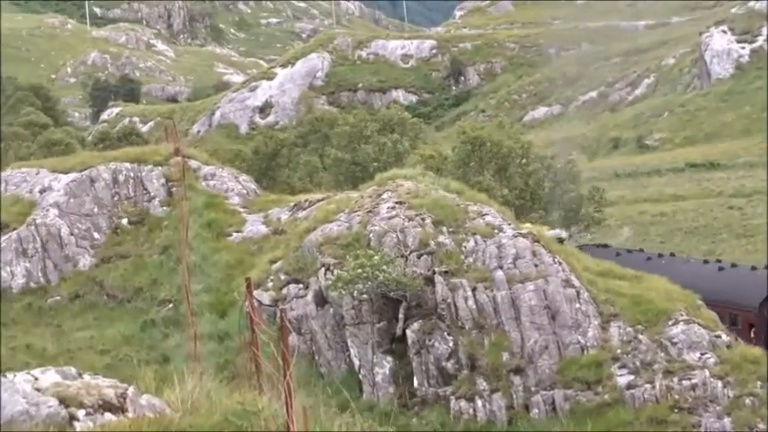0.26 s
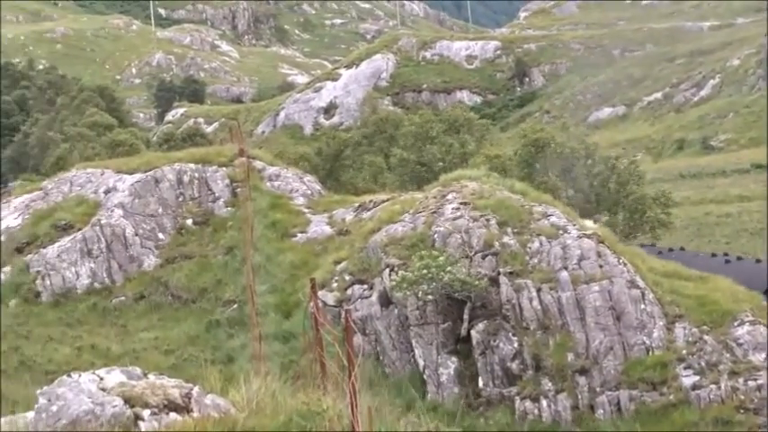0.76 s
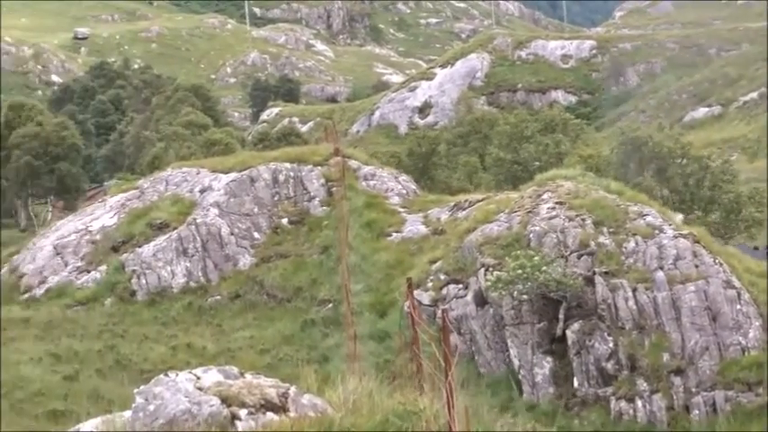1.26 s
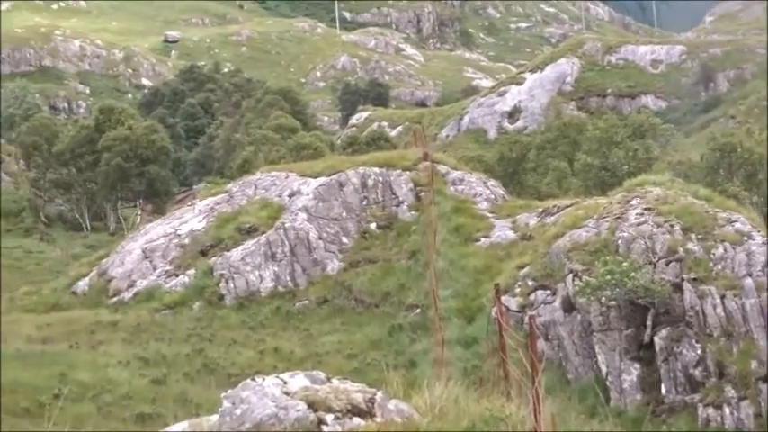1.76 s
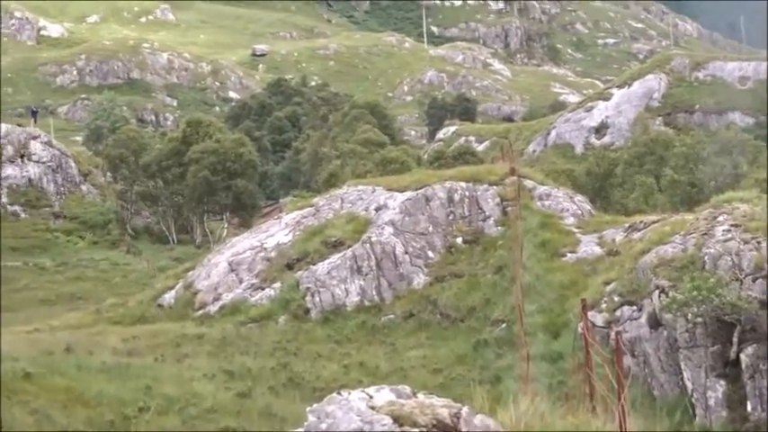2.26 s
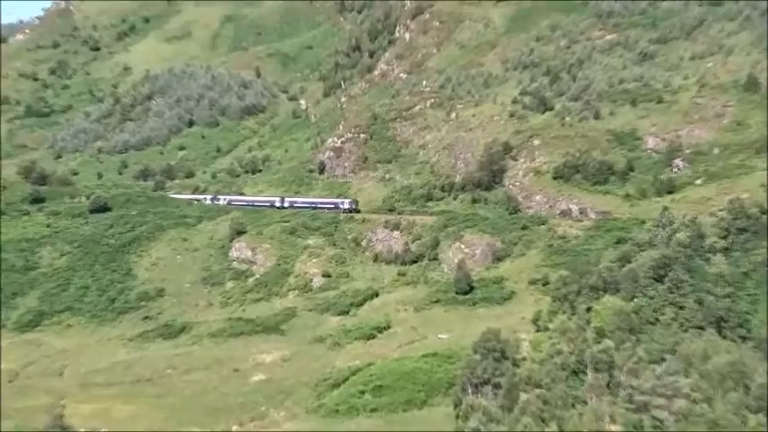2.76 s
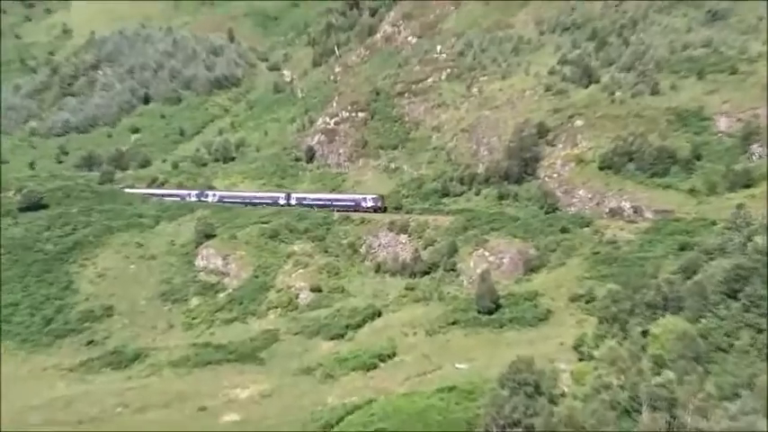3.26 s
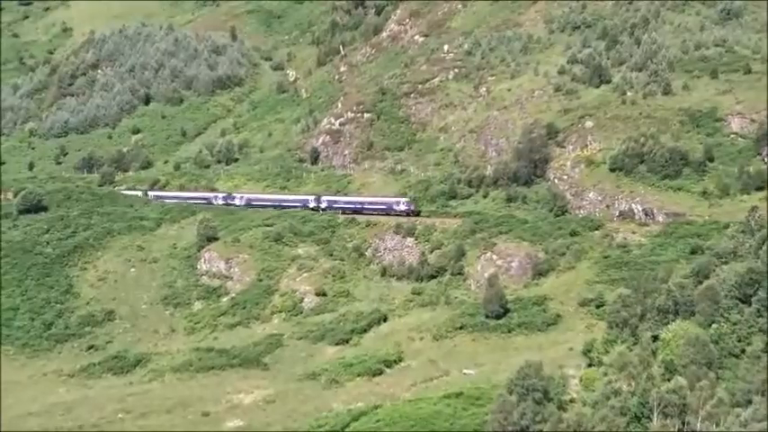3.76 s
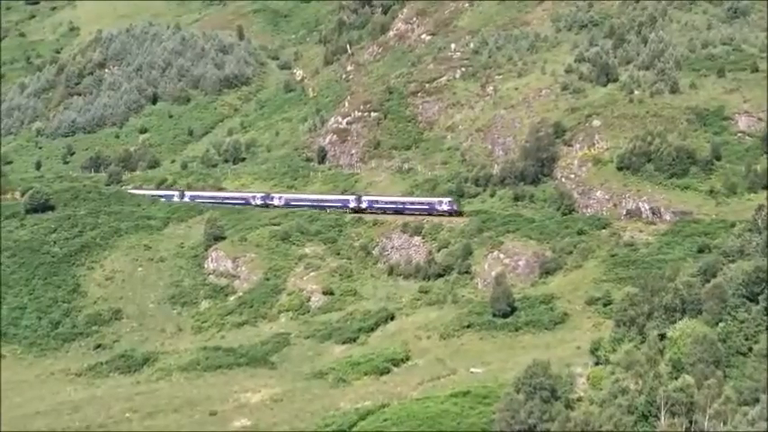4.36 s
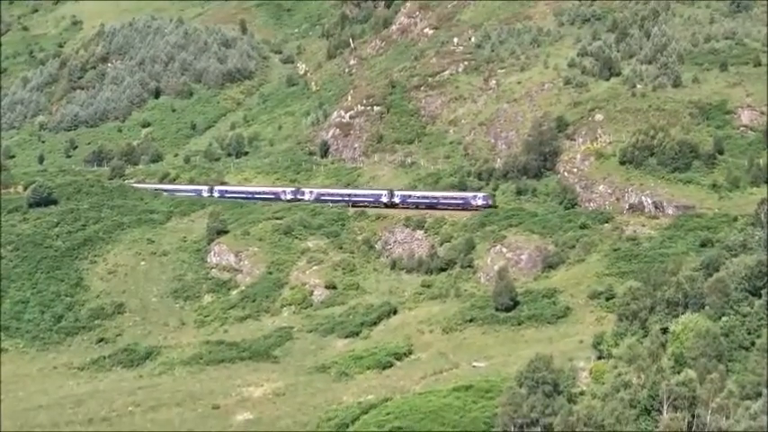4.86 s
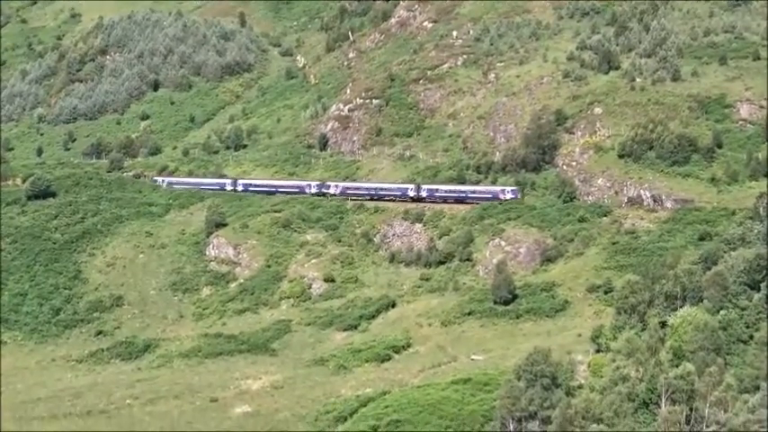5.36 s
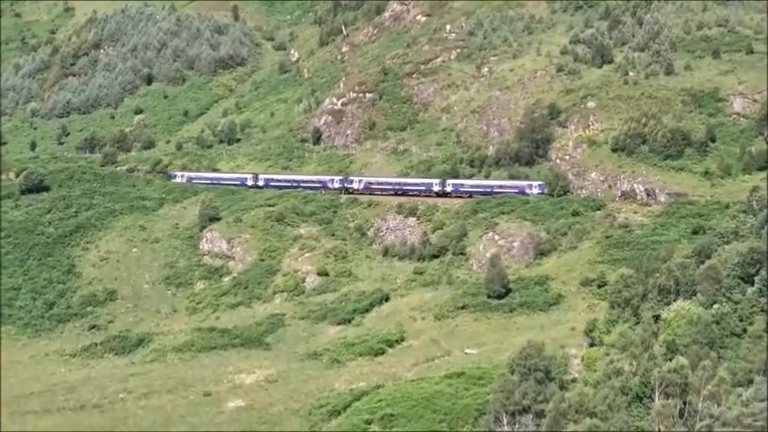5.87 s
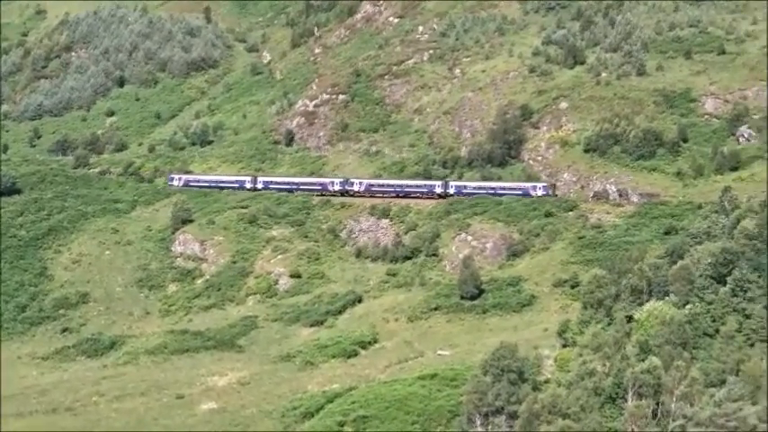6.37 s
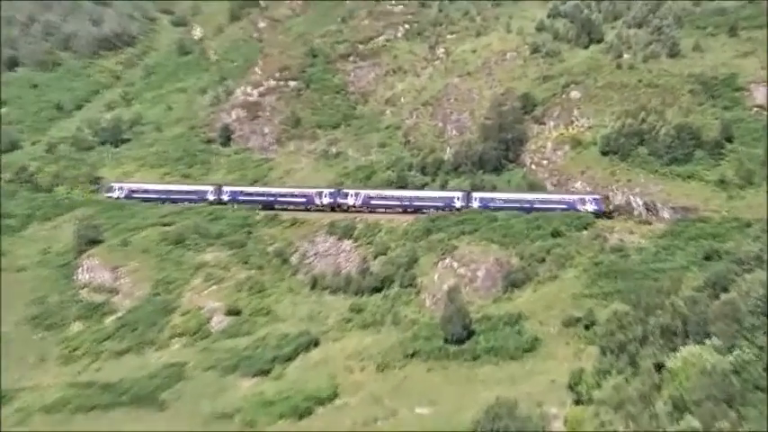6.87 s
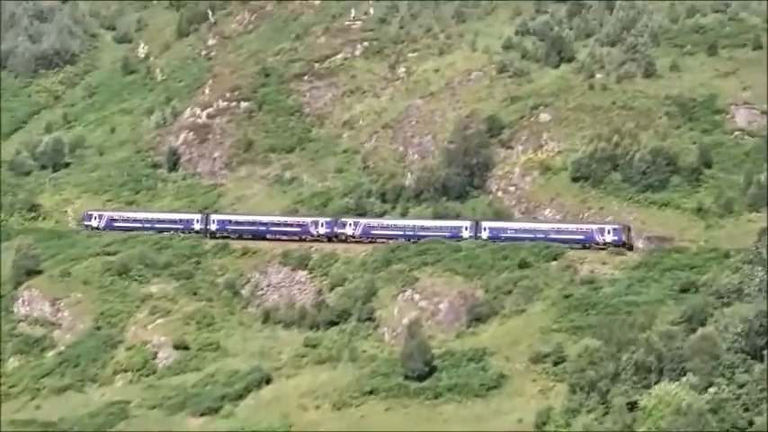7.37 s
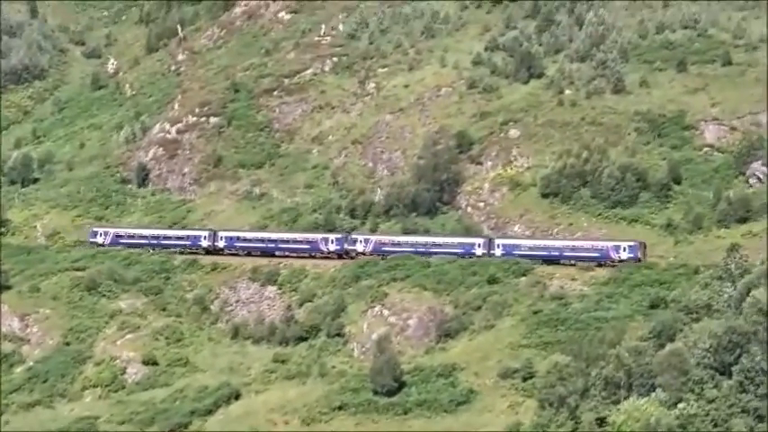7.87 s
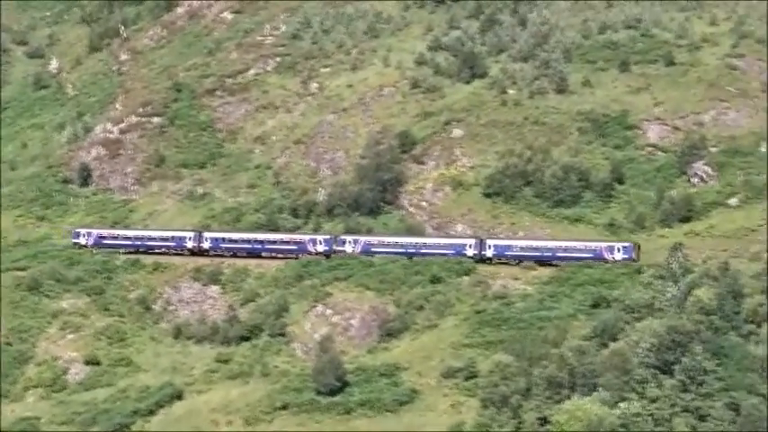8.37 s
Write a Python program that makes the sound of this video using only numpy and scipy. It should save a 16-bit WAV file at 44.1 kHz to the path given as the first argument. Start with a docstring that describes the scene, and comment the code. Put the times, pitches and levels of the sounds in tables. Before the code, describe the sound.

Loud rapid steam exhaust beats over rolling coaches stop dead; a faraway railcar then rumbles and knocks across a valley, with early gusts on the microphone.

```python
"""Hillside above a railway

Heard from a hillside through a camcorder's two microphone ports. Close below, a steam engine works hard:
band-split noise makes the exhaust beats, coaches and steam spurts, and wavering sines the flange squeals.
After an abrupt cut and a moment of silence, a railcar train rolls far across the valley, its bogies knocking
in pairs in ringing noise over a flickering roar. Low noise gusts buffet the microphone. At the camcorder
itself, resonant noise whirs as the zoom motor, short bursts tick on the body, and the preamplifier hisses."""
import sys
import numpy as np
from scipy import signal
from scipy.fft import rfft, irfft
from scipy.io import wavfile
from scipy.ndimage import uniform_filter1d

SR = 44100
rng = np.random.default_rng(int(sys.argv[2]) if len(sys.argv) > 2 else 0)


def int16_out(signal):
    """Quantize to a 16-bit WAV file."""
    q = np.round(np.clip(np.atleast_2d(signal).T, -1, 1) * 32767)
    wavfile.write(sys.argv[1], SR, q.astype(np.int16))


N = 379701
T = np.arange(N) / SR
FREQS = np.fft.rfftfreq(N, 1 / SR) + 1e-3  # Hz, kept off zero for the logarithms

# The near view ends and the far view starts [s]; upper limit of the sound [Hz]
CUT_S, RESUME_S = 2.582, 2.619
TOP_HZ = 15750

# Event levels are nominal: trims and random flutter in the functions, then the gain control, act on them.

# Close below: the four strokes of one turn of the driving wheels, late or early from uneven valve timing:
# (lateness [s], level [dB], blast length [s])
WHEEL_STROKES = [(-0.0032, -13.0, 0.053), (0.00086, -13.5, .057), (0.0054, -13, .054), (0, -12, 0.058)]
# Treble of the exhaust beats: (time [s], level [dB])
BEAT_TREBLE = [(0.05, 1), (.7, -2), (1.4, -2), (1.95, 1.5)]
# First beat, nominal spacing, and how much each spacing shortens as the engine gathers speed
FIRST_BEAT_S, BEAT_S, QUICKEN_S = .038, .146, .00031
# Rolling coaches: (time [s], level [dB])
COACH_LEVEL = [(0, -21), (0.7, -19), (1.2, -18), (1.85, -16.6), (2.55, -17)]
# Spurts of steam: (time [s], level [dB], length [s], brightness [dB])
STEAM_SPURTS = [(.59, -24.5, 0.028, -1), (.845, -23, 0.015, -2), (1.182, -18, 0.0083, -1),
                (1.428, -19.5, 0.03, -3.5), (2.546, -15.5, 0.018, -1)]
# Wheel flange squeals: (time [s], length [s], pitch [Hz], level [dB])
FLANGE_SQUEALS = [(0.85, 0.096, 5590, -35), (.84, 0.12, 8160, -33.5), (0.85, 0.11, 8500, -32),
                  (1.145, .04, 9800, -36.5), (1.38, 0.14, 8130, -43), (1.42, 0.15, 7010, -40),
                  (1.48, 0.035, 8480, -27.5), (2.04, .06, 8250, -47), (2.461, .08, 8480, -31.5)]

# Across the valley: bogies crossing rail joints:
# (time [s], leading axle level [dB], trailing axle level [dB], brightness [dB])
BOGIE_CROSSINGS = [(2.841, -25.5, -25, 4.5), (2.981, -31, -33, 3), (3.369, -22, -20.5, 4.5),
                   (4.168, -29, -28.5, -0.5), (4.556, -28, -29, -1.5), (4.687, -27, -31, -4),
                   (5.068, -27, -31.5, -4), (5.482, -29, -29.5, -3), (5.986, -30.5, -29, -2),
                   (6.222, -29.5, -32.5, -2.5), (6.718, -34.5, -30.5, -1.5), (7.129, -27.5, -28, -1.5),
                   (7.262, -30.5, -32.5, -2), (7.629, -33, -30, -0.5), (7.985, -35, -31, -0.5),
                   (8.385, -25, -29, -3)]
# Distance between the axles of a bogie; speed of the train at the start of the far view, and its gain
AXLE_GAP_M, SPEED_M_S, GAIN_M_S2 = 2.6, 13.25, .19
# How long a knock holds; the fainter joints: knocks a second, level, brightness
KNOCK_S, CLATTER_PER_S, CLATTER_DB, CLATTER_BRIGHT_DB = .02, 5, -38.5, -1.5
# Roar of the distant wheels: (time [s], middle level [dB], treble level [dB])
ROAR_LEVELS = [(2.65, -41.5, -46), (3.81, -32.5, -39), (4.72, -35, -48), (5.17, -37.5, -47),
               (5.62, -37, -48.5), (6.74, -44, -49), (7.32, -39, -46.5), (8.6, -33.5, -44.5)]
# Its bass at the start of the far view, and its steady growth as the train comes nearer
RUMBLE_DB, RUMBLE_DB_PER_S = -40.5, 0.65

# Gusts on the microphone: (time [s], level [dB], time from onset to the start of the fall [s])
WIND_GUSTS = [(2.638, -38, 0.19), (2.99, -37.5, 0.56), (4.1, -57, .45), (6.65, -65, .8)]
BREEZE_DB, GUST_RISE_S, GUST_FALL_S = -61, 0.1, 0.14

# At the camcorder: zoom motor runs: (start [s], stop [s], level [dB])
ZOOM_RUNS = [(2.61, 3.45, -51), (6.556, 7.126, -53)]
# Ticks of its body: (time [s], level [dB], resonance [Hz])
BODY_TICKS = [(3.003, -33, 2390), (3.321, -32, 1800), (3.334, -31.5, 1900), (6.335, -44, 3000),
              (7.042, -29, 1900), (7.596, -32.5, 2970)]

# Spectrum of the exhaust blast: (frequency [Hz], relative density [dB per Hz])
BLAST_SPECTRUM = [(60, -25), (130, -11), (240, -2.5), (370, -5.5), (520, 0), (700, -1.5), (780, -10.5),
                  (1000, -4), (1220, -15), (1450, -11), (2200, -15), (5500, -31), (8300, -29), (14500, -55)]
# Spectrum of the coaches: (frequency [Hz], relative density [dB per Hz])
COACH_SPECTRUM = [(25, -18), (50, -8.5), (95, -11), (170, -1), (290, 2), (430, -6), (720, -6.5),
                  (1200, -15), (2300, -16.5), (6200, -33.5), (8300, -31.5), (14500, -56)]
# Spectrum of the steam spurts: (frequency [Hz], relative density [dB per Hz])
STEAM_SPECTRUM = [(500, 1.5), (1500, 1), (3300, 0), (5500, -9.5), (8500, -9), (15000, -37)]
# Spectrum of the distant train: (frequency [Hz], relative density [dB per Hz])
VALLEY_SPECTRUM = [(100, -28.5), (200, -12.5), (320, 1.5), (420, 0.5), (530, -5), (780, -1), (1020, -7),
                   (1170, -17.5), (1500, -17), (1850, -20.5), (2400, -22.5), (3900, -33), (6000, -51)]
# Spectrum of wind on the microphone: (frequency [Hz], relative density [dB per Hz])
WIND_SPECTRUM = [(20, -6), (50, 1), (140, 0), (230, -5.5), (500, -46)]
# Spectrum of the preamplifier hiss: (frequency [Hz], relative density [dB per Hz])
HISS_SPECTRUM = [(4000, 2.5), (6300, -5), (8300, 2.5), (15500, -1.5)]
# Metallic ring of the distant train: (frequency [Hz], width [Hz], level relative to its spectrum [dB])
TRAIN_RINGS = [(1475, 250, -8), (2330, 123, 8), (3010, 79, 0), (3810, 140, -1)]
# Modes of the camcorder housing: (frequency [Hz], width [Hz], relative level [dB])
HOUSING_MODES = [(7500, 1800, -0.5), (10100, 770, 0), (11600, 820, -1), (13600, 1200, 5)]

# Between the ports, for sound from one side: (frequency [Hz], phase by which left leads [rad])
LEFT_LEAD = [(60, 0.08), (350, .36), (750, .53), (1500, .56), (3000, 0.38), (7000, 0.04)]
# Between the ports, for the near view: (frequency [Hz], left minus right [dB])
NEAR_BALANCE = [(60, -0.5), (700, -0.5), (1290, -3), (4400, -1.5), (8000, -0.8)]
# Difference noise against shared noise at the ports: (frequency [Hz], level [dB])
PORT_DIFFERENCE = [(50, -17), (200, -21), (600, -19), (1200, -15), (3000, -12.5), (7000, -12), (13000, -16)]


def exhaust(bark_db=2.5, hiss_db=2.0, bark_rasp_db=1.1, hiss_rasp_db=2.0, patchy_db=2.5, split_hz=1300):
    """Each cylinder stroke barks in the chimney at once; the ragged hiss of the jet swells after it."""
    body, hiss = split(scatter(noise(BLAST_SPECTRUM), patchy_db), split_hz)
    strokes = beats()
    bark, _ = puffs(strokes, rise=.013, fall=.024, sag_db=2.1)
    _, jet = puffs(strokes, rise=0.019, fall=0.025, sag_db=1.9)
    eddies = walk(200)
    barking = body * bark * undb(bark_db + bark_rasp_db * eddies)
    hissing = hiss * jet * undb(hiss_db + hiss_rasp_db * eddies)
    return barking + hissing


def beats(count=18, uneven_db=0.9):
    """Four beats a wheel turn, slowly quickening: rows of (time [s], level [dB], length [s], brightness [dB])."""
    k = np.arange(count)
    late, db, length = np.array(WHEEL_STROKES)[k % len(WHEEL_STROKES)].T
    s = FIRST_BEAT_S + BEAT_S * k - QUICKEN_S * k ** 2 / 2 + late
    level_db = db + uneven_db * rng.standard_normal(count)
    bright_db = np.interp(s, *np.transpose(BEAT_TREBLE))
    return np.column_stack([s, level_db, length, bright_db])


def coaches(roll_db=-0.04, rattle_db=1.0, patchy_db=2.5):
    """Wheels rumble and rattle on the rails under the beats."""
    level_db, = curves(COACH_LEVEL)
    rolling = scatter(noise(COACH_SPECTRUM), patchy_db)
    return rolling * undb(level_db + roll_db + rattle_db * walk(45))


def spurts(split_hz=5000):
    """Short, sharp escapes of steam."""
    body, hiss = split(noise(STEAM_SPECTRUM), split_hz)
    low, high = puffs(STEAM_SPURTS, rise=0.0017, fall=0.0083)
    return body * low + hiss * high


def flanges(waver=.004, flutter_db=2.8):
    """Flanges rub the curved rail and briefly set a high wheel mode singing."""
    out = np.zeros(N)
    warped_time = np.cumsum(1 + waver * walk(170)) / SR  # makes the pitches waver together
    for s, length, hz, db in FLANGE_SQUEALS:
        on = (T > s) & (T < s + length)
        swell = np.sin(np.pi * (T[on] - s) / length)
        out[on] += undb(db) * np.sqrt(2) * swell * np.sin(2 * np.pi * hz * warped_time[on])
    return out * undb(flutter_db * walk(50))


def rail_joints(knock_db=0.3, treble_db=1.2, rasp_db=1.7, split_hz=900):
    """Wheels of the distant train knock on the rail joints; the ground on the way roughens each knock."""
    rough = unit(far_noise(patchy_db=1.5) * undb(rasp_db * walk(200)))
    body, hiss = split(rough, split_hz)
    low, high = puffs(knocks(), rise=0.0078, fall=0.02, sag_db=1.2)
    return undb(knock_db) * (body * low + undb(treble_db) * hiss * high)


def knocks(spread_db=0.5):
    """Axle pairs and random clatter as rows of (time [s], level [dB], length [s], brightness [dB])."""
    rows = []
    for s, leading_db, trailing_db, bright_db in BOGIE_CROSSINGS:
        speed = SPEED_M_S + GAIN_M_S2 * (s - RESUME_S)
        rows.append((s, leading_db, KNOCK_S, bright_db))
        rows.append((s + AXLE_GAP_M / speed, trailing_db, KNOCK_S, bright_db))
    # fainter joints, at scattered times and strengths
    for k, (when, strength) in enumerate(rng.uniform(-1.006, 1, size=(60, 2))):
        s = RESUME_S + (k + 1 + when) / CLATTER_PER_S
        rows.append((s, CLATTER_DB + spread_db * strength, KNOCK_S, CLATTER_BRIGHT_DB))
    return rows


def valley(middle_db=0.0, treble_db=-0.3, flicker_db=1.15, sway_db=0.74, low_hz=550, high_hz=1150):
    """The slopes smear the rolling wheels into a flickering roar whose bass, middle and treble sway apart."""
    body, hiss = split(far_noise(patchy_db=2), high_hz)
    bass, mid = split(body, low_hz)
    middle, treble = curves(ROAR_LEVELS)
    rumble = RUMBLE_DB + RUMBLE_DB_PER_S * (T - RESUME_S)
    bands = [(bass, rumble), (mid, middle + middle_db), (hiss, treble + treble_db)]
    roar = sum(unit(x) * undb(db + sway_db * walk(17.1)) for x, db in bands)
    return roar * undb(flicker_db * walk(28.3))


def far_noise(patchy_db):
    """Noise of the distant train: dulled by the air, with a metallic ring."""
    x = noise(VALLEY_SPECTRUM)
    return scatter(x + resonances(x, TRAIN_RINGS), patchy_db)


def wind(buffet_db=3.0):
    """Gusts swell, hold and die away over a light breeze; their eddies buffet the microphone."""
    force = undb(BREEZE_DB)
    for s, db, length in WIND_GUSTS:
        rise = np.clip((T - s) / GUST_RISE_S, 0, 1)
        fall = np.exp(-np.maximum(T - s - length, 0) / GUST_FALL_S)
        force = force + undb(db) * rise * fall
    return noise(WIND_SPECTRUM, apart_db=9) * force * undb(buffet_db * walk(11.4))


def camcorder(hiss_db=-60.0, gear_db=2.0, flutter_db=1.0, apart=0.37):
    """The gears of the zoom motor whir and flutter in the housing, and the preamplifier hisses."""
    running = sum(undb(db) * ((T > start) & (T < stop)) for start, stop, db in ZOOM_RUNS)
    shared = rng.standard_normal(N)
    grind = shared + apart * np.array([[1], [-1]]) * rng.standard_normal(N)
    teeth = undb(gear_db * walk(120) + flutter_db * walk(14))
    motor = unit(resonances(grind * teeth, HOUSING_MODES))
    whir = motor * uniform_filter1d(running, size=600)  # softens each start and stop
    return whir + undb(hiss_db) * noise(HISS_SPECTRUM, apart_db=8)


def ticks(decay=.004, q=.8):
    """Fingers tick on the camcorder: each is a short burst in one broad resonance of its body."""
    out, age = np.zeros(N), T[:int(10 * decay * SR)]
    for s, db, hz in BODY_TICKS:
        body = signal.iirpeak(hz, q, fs=SR)
        once = signal.lfilter(*body, rng.standard_normal(len(age)))
        grit = unit(signal.lfilter(*body, once))
        start = int(s * SR)
        out[start:start + len(age)] += undb(db) * grit * np.exp(-age / decay)
    return out


def ports(x, balance_db=0):
    """A sound from one side differs in phase and level between the two ports."""
    half = undb(balance_db / 2) * np.exp(.5j * across(LEFT_LEAD))
    return irfft(rfft(x) * np.array([half, 1 / half]), N)


def scatter(x, depth_db, size=(3, 7)):
    """Shifting reflections off rocks and ground: random patches of frequency and time grow or weaken."""
    frames = signal.stft(x, nperseg=2048)[2]
    field = signal.fftconvolve(rng.standard_normal(frames.shape[1:]), np.ones(size), "same")
    return unit(signal.istft(frames * undb(depth_db * unit(field)))[1][:, :N])


def puffs(table, rise, fall, sag_db=0):
    """Envelopes of the low and high part of puffs or knocks: each rises, sags while it holds, then dies away."""
    low, high = np.zeros((2, N))
    for s, db, length, bright_db in table:
        span = slice(max(int(s * SR), 0), int((s + .5) * SR))
        age = T[span] - s
        opening = np.clip(age / rise, 0, 1) ** 2
        sag = undb(sag_db * (1 - 2 * age / length))
        shape = opening * sag * np.exp(-np.maximum(age - length, 0) / fall)
        low[span] += undb(db) * shape
        high[span] += undb(db + bright_db) * shape
    return low, high


def noise(points, apart_db=0):
    """Noise with a spectrum and rms 1 at two ports: a shared part, and a part opposite in sign at each."""
    mid, side = rng.standard_normal((2, 2 * len(FREQS))).view(complex)
    side = side * undb(across(PORT_DIFFERENCE) + apart_db)
    return unit(irfft(np.array([mid + side, mid - side]) * undb(across(points)), N))


def resonances(x, modes):
    """The ringing of (frequency [Hz], width [Hz], level [dB]) modes driven by x."""
    response = sum(undb(db) / (1 + 1j * (FREQS ** 2 - hz ** 2) / (FREQS * width)) for hz, width, db in modes)
    return irfft(rfft(x) * response, N)


def split(x, hz):
    """The parts of x below and above hz."""
    low = irfft(rfft(x) / (1 + (FREQS / hz) ** 8), N)
    return low, x - low


def walk(rate):
    """Random wander joined by straight lines, about rate swings a second; rms 1."""
    knots = rng.standard_normal(int(2 * rate * N / SR) + 2)
    return unit(np.interp(2 * rate * T, np.arange(len(knots)), knots))


def curves(table):
    """The columns of a time table, one value a sample."""
    s, *columns = np.transpose(table)
    return [np.interp(T, s, c) for c in columns]


def across(points):
    """A (frequency [Hz], value) table on every frequency."""
    hz, value = np.transpose(points)
    return np.interp(np.log(FREQS), np.log(hz), value)


def undb(db):
    """Decibels to gain."""
    return 10 ** (np.asarray(db) / 20)


def unit(x):
    """Scale to rms 1."""
    return x / np.sqrt(np.mean(x ** 2))


def scene():
    """The close pass, a moment of silence, then the far view."""
    near = ports(exhaust() + coaches() + spurts() + flanges(), across(NEAR_BALANCE))
    far = ports(rail_joints() + valley() + wind()) + camcorder() + ticks()
    return near * (T < CUT_S) + far * (T > RESUME_S)


def record(dry, limit_db=-12.0):
    """Gain control holds down the loudest stretches, peaks are rounded off, and the top is cut."""
    power = uniform_filter1d(np.mean(dry ** 2, axis=0), size=800)
    excess = np.maximum(power / undb(limit_db) ** 2, 1)
    held = dry / excess ** (1 / 3)  # 3 dB more in gives 1 dB more out above the limit
    rounded = held / (1 + held ** 8) ** (1 / 8)
    return signal.sosfilt(signal.ellip(10, .2, 70, TOP_HZ, fs=SR, output="sos"), rounded)


dry = scene()
out = record(dry)
int16_out(out)
```